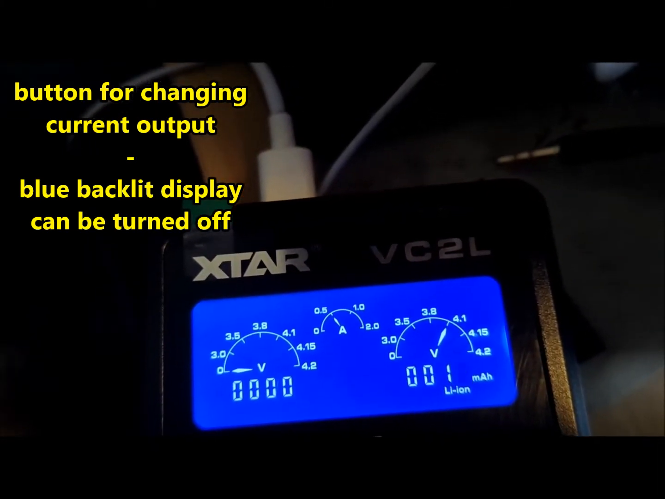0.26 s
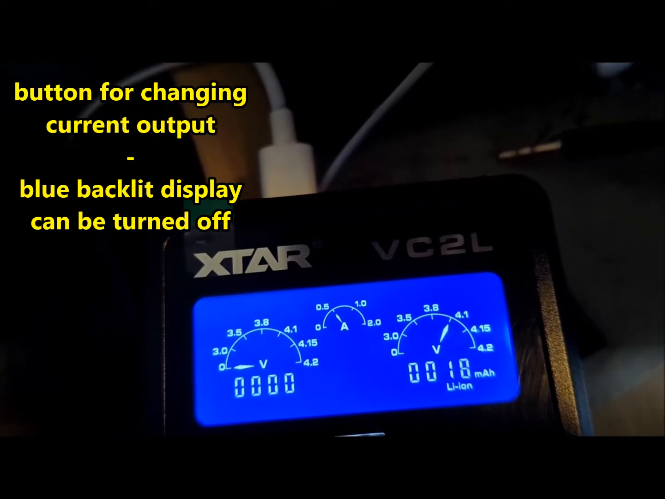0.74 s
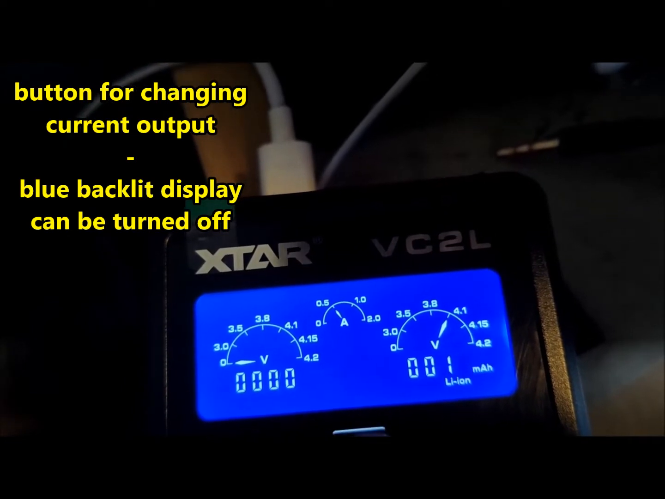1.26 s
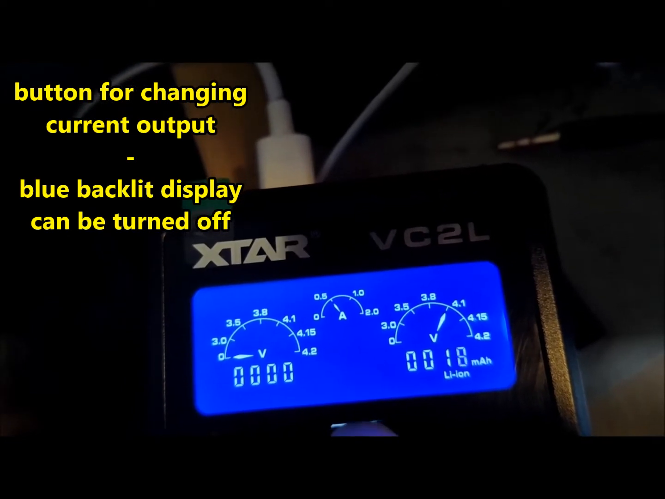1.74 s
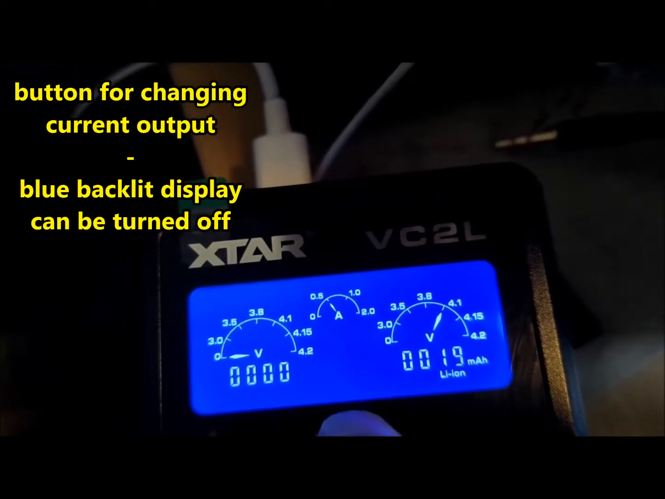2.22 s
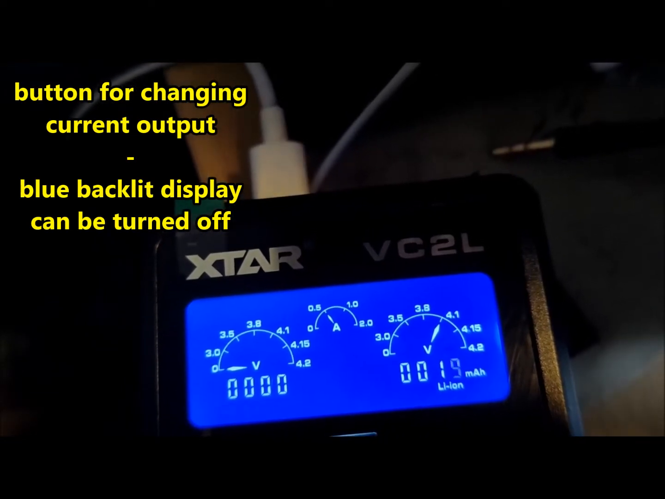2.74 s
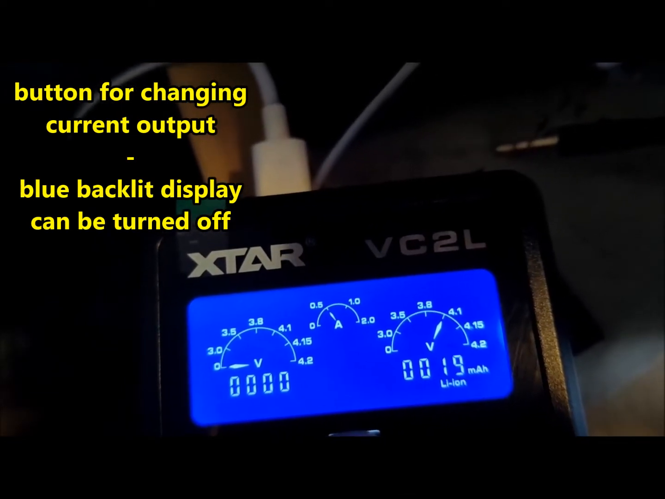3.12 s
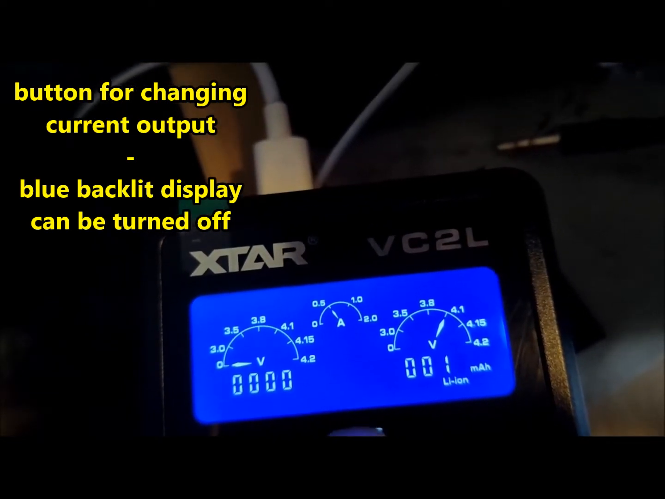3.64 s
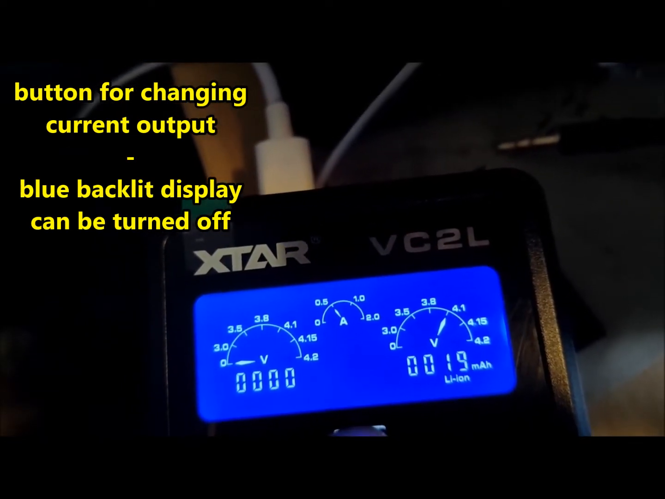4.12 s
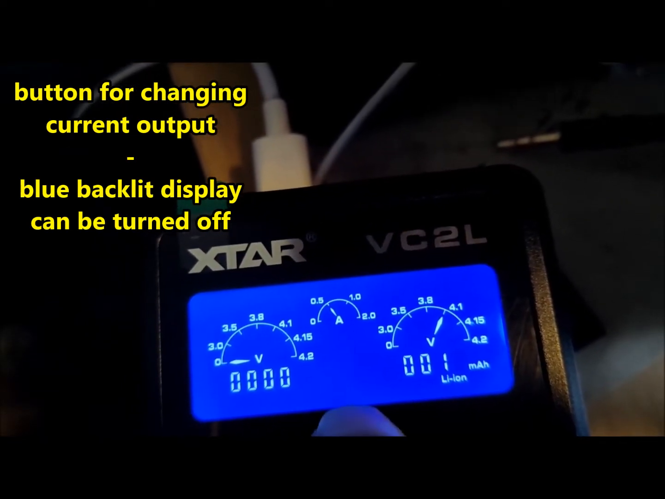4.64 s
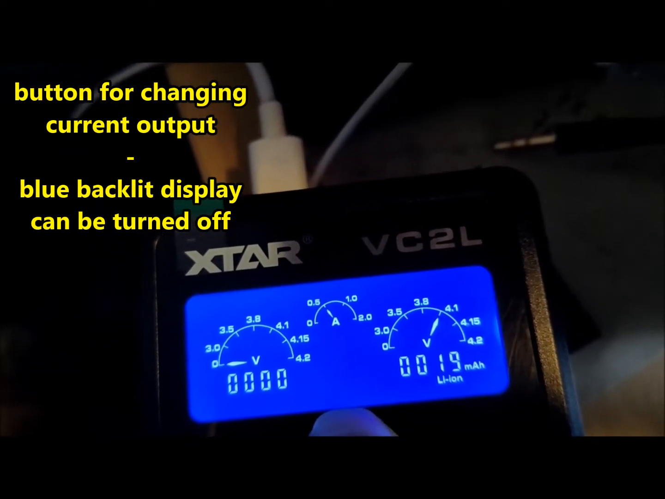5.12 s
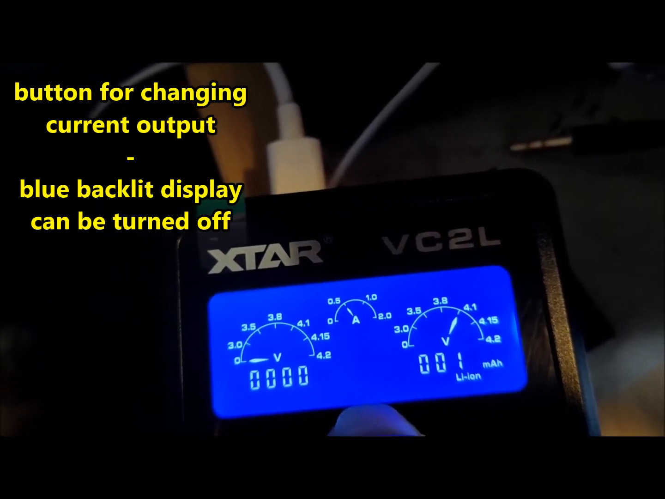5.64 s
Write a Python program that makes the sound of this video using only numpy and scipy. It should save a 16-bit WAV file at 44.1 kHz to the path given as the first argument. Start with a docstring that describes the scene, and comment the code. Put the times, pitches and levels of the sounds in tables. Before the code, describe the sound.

A finger works a small snappy push button on a plastic gadget, clicking down and springing back, with soft skin scuffs between.

```python
"""Small push button of a plastic battery charger, worked by a finger on a desk in a quiet room.
Each press and release snaps a metal dome; impulses ring modal resonators for dome, stem, cap, case and desk.
The loose cap also taps its seat. The finger rubs and nudges the case: stick-slip knocks and ticks,
rumble and rustle from shaped noise, one short judder from a wavering sine.
Room: discrete echoes and a banded noise tail. Underneath: faint mains hum (sines) and hiss (shaped noise)."""
import sys
import numpy as np
from scipy import signal
from scipy.fft import rfft, irfft
from scipy.io import wavfile

SR = 44100
rng = np.random.default_rng(int(sys.argv[2]) if len(sys.argv) > 2 else 0)


def waveform_to_disk(signal):
    """Save audio, clipped to [-1, 1], as 16-bit WAV at the path in sys.argv[1]."""
    frames = np.transpose(np.atleast_2d(signal))
    scaled = np.clip(frames, -1, 1) * 32767
    samples = np.round(scaled).astype(np.int16)
    wavfile.write(sys.argv[1], SR, samples)


N = 258896

# hum partials: f/Hz, mean level/dB rms
HUM_PARTIALS = [(119.5, -80), (238, -76.5), (360, -87)]
# hiss colour: f/Hz, relative density/dB
HISS_COLOUR = [(25, -19.5), (45, -10), (62, -13.5), (95, -14), (125, -6), (190, -12.5), (260, -8.5),
               (400, -6), (600, -12), (780, -16.5), (1150, -16), (2200, -22), (4600, -30.5), (6600, -20.5),
               (8200, -37), (11000, -70)]
HISS_RMS_DB = -74.5

# near echoes off the desk and things near by: delay/s, level/dB
ECHOES = [(.0016, -16.5), (.0035, -21.5), (.0047, -24.5), (.0097, -21), (0.0099, -26), (.042, -34)]
# diffuse tail colour: f/Hz, level/dB
TAIL_COLOUR = [(120, -7.5), (200, -4), (300, -14), (600, -9), (1100, -18), (1700, -24.5), (2500, -20.5),
               (3500, -24.5), (4500, -22), (6500, -15), (8000, -21)]
# diffuse tail decay: f/Hz, T60/s
TAIL_T60 = [(120, .2), (1000, 0.21), (4000, .19), (6500, 0.25), (8000, 0.2)]

# finger sliding on the case, before trim and flutter: t/s, rumble level/dB, rustle level/dB
RUB_LEVELS = [(0.0, -73, -77.5), (0.9, -72.5, -77.5), (1.45, -69.5, -77), (1.91, -70.5, -74.5),
              (2.48, -68, -71.5), (2.81, -66.5, -72), (3.32, -64.5, -68.5), (3.76, -69.5, -70.5),
              (4.51, -72.5, -71.5), (4.77, -77, -71.5), (5.56, -75, -73), (5.87, -79.5, -76.5)]
# rumble colour: f/Hz, relative density/dB
RUMBLE_COLOUR = [(15, -40), (25, -11), (96, -8), (125, 2), (151, -9.5), (177, -1.5), (199, -3),
                 (417, -13.5), (644, -6), (800, -24.5), (1040, -44.5), (1760, -120)]
# rustle colour: f/Hz, relative density/dB
RUSTLE_COLOUR = [(300, -22), (500, -8), (1150, 0.5), (2100, 0), (3000, -3.5), (4200, -14.5), (5200, -15),
                 (6400, -5.5), (7000, -10.5), (7800, -23), (8400, -48.5)]
# drags, each a run of slips: start/s, length/s, slip level before knock and tick gains/dB
DRAGS = [(2.025, .01, -57.5), (2.134, .01, -59.5), (2.276, .11, -58), (2.438, .08, -56.5),
         (2.649, .01, -55.5), (2.717, .01, -56), (3.028, .01, -56), (3.398, .035, -58), (3.549, .01, -58),
         (4.656, .035, -59.5), (5.059, .01, -56)]
SLIP_INTERVAL_S = .0238
# lesser random slips: rate at hardest rubbing, offset from the RUB_LEVELS rumble, random spread
STRAY_SLIPS_PER_S, STRAY_OFFSET_DB, STRAY_SPREAD_DB = 14, 4, 3.5
# slip resonances: f/Hz, width/Hz, level/dB
KNOCK_MODES = [(170.0, 153, 31.4), (269.4, 220, 23.4)]
TICK_MODES = [(600, 160, 7.5), (1780, 650, 5.3), (6400, 590, 5)]
JUDDER_HZ = 240   # mean
JUDDER_START_S, JUDDER_ATTACK_S, JUDDER_HOLD_S, JUDDER_RELEASE_S = 4.962, 0.017, .06, .02
JUDDER_DB, JUDDER_SAG_DB_PER_S = -54, 89   # sag runs from the start of the attack

# modes of the desk: f/Hz, width/Hz, level/dB
DESK_MODES = [(125, 21, 0), (180, 50, -6), (285.3, 55.3, 8), (334, 83, 4)]
# modes of the case: f/Hz, width/Hz, level/dB
CASE_MODES = [(530, 51, -16.5), (641, 46, -6), (789, 63, -1.5), (1095, 71, 0), (1370, 47, 3),
              (1641, 99, 11), (1920, 84, -7), (2095, 31, -7.5)]
# modes of the button cap: f/Hz, width/Hz, level/dB
CAP_MODES = [(2630, 200, -16.5), (2739, 150, 2), (2890, 210, -4), (3217, 130, 1.5)]
# modes of the button stem: f/Hz, width/Hz, level/dB
STEM_MODES = [(3450, 130, 9), (3640, 370, -1), (4300, 180, -4), (4930, 73, -12)]
# modes of the metal dome: f/Hz, width/Hz, level/dB
DOME_MODES = [(5700, 130, 2.8), (6000, 240, 15), (5970, 120, 16), (6510, 230, 27.56), (6920, 190, 23),
              (7300, 480, 13), (7700, 480, 11), (8100, 520, 2.2)]
# far sound, humps driven by case, cap, dome: gain/dB, f/Hz, width/Hz
FAR_HUMPS = [(5, 1400, 2000), (0, 3000, 1400), (24, 6750, 1700)]
# button goes down, dome buckles: t/s, force/dB, extra dome ping/dB
PRESSES = [(1.4608, -11.5, -19), (2.914, -2, -6), (4.119, -4, 5.5), (4.9168, -4.5, 5.5)]
# button springs back up: t/s, force/dB
RELEASES = [(0.001, -16.5), (0.2374, -3), (1.8014, -2.5), (3.1978, -2), (4.4176, 0.5), (5.2691, 1.24)]
# loose cap taps its seat: t/s, force/dB
TAPS = [(0.2527, -1.5), (0.2662, -10), (3.802, -5), (3.8141, -15)]
# share of a 0 dB press: desk/dB, case/dB, cap/dB, stem/dB, dome before ping/dB
PRESS_MIX = (-2, 0, 2.5, 12.5, -7.5)
# share of a 0 dB release: desk/dB, case/dB, cap/dB, stem/dB, dome/dB
RELEASE_MIX = (-0.2, -0.5, 2.5, -4, -25.5)
# share of a 0 dB tap: desk/dB, case/dB, cap/dB, stem/dB, dome/dB
TAP_MIX = (-16.5, -21, -17.5, -26, -35.5)
# harder is brighter, gain per dB of force: desk, case, cap, stem, dome (all dB/dB)
HARDNESS = (.5, 1.01, 1.4, 3.5, 1.27)

PASSBAND_EDGE_HZ = 7950


def from_db(db):
    """Decibels to gain."""
    return 10 ** (np.asarray(db) / 20)


def rms_one(x):
    """Scale to unit rms."""
    return x / np.sqrt(np.mean(x ** 2) + 1e-20)


def in_time(rows):
    """Interpolate each column of a time curve to every sample."""
    knots_s, *columns = np.transpose(rows)
    t = np.arange(N) / SR
    return [np.interp(t, knots_s, column) for column in columns]


def at_hz(points, hz):
    """Interpolate a spectrum on a log-frequency axis."""
    points_hz, values = np.array(points).T
    return np.interp(np.log(hz + 1), np.log(points_hz), values)


def noise(colour):
    """Steady Gaussian noise shaped in the spectrum, rms 1."""
    gain = from_db(at_hz(colour, np.fft.rfftfreq(N, 1 / SR)))
    return rms_one(irfft(rfft(rng.standard_normal(N)) * gain, N))


def drift(knots_per_s):
    """Slow random wander between Gaussian knots, rms 1."""
    position = np.arange(N) / SR * knots_per_s
    return rms_one(np.interp(position, np.arange(4096), rng.standard_normal(4096)))


def impulses(times_s, levels_db):
    """One impulse per blow."""
    out = np.zeros(N)
    index = np.round(np.asarray(times_s) * SR).astype(int)
    out[np.clip(index, 0, N - 1)] = from_db(levels_db)
    return out


def chatter(times_s, levels_db, share_db, t60_s):
    """A clean impulse per blow, then decaying noise as loose parts go on touching."""
    hits = impulses(times_s, levels_db)
    fall = from_db(-120 / (t60_s * SR))   # on power: 60 dB in t60_s
    power = signal.lfilter([1 - fall], [1, -fall], hits ** 2 + 1e-30)
    return hits + from_db(share_db) * np.sqrt(power) * rng.standard_normal(N)


def resonate(x, hz, width_hz):
    """Two-pole resonance, peak gain about 1."""
    r = np.exp(-np.pi * width_hz / SR)
    b = (1 - r * r) / 2
    a = [1, -2 * r * np.cos(2 * np.pi * hz / SR), r * r]
    return signal.lfilter([b, 0, -b], a, x + 1e-18)


def ring(x, modes):
    """Sum the modes of a part; neighbours have opposite sign."""
    out = np.zeros(N)
    for k, (hz, width_hz, db) in enumerate(modes):
        out += (-1) ** k * from_db(db) * resonate(x, hz, width_hz)
    return out


def background(waver_db=0.5):
    """Mains hum as sines of slowly wavering level, plus steady hiss."""
    t = np.arange(N) / SR
    hum = np.zeros(N)
    for hz, db in HUM_PARTIALS:
        level = from_db(db + waver_db * drift(6.7))
        hum += level * np.sqrt(2) * np.sin(2 * np.pi * (hz * t + rng.random()))
    return hum + from_db(HISS_RMS_DB) * noise(HISS_COLOUR)


def room(near, far, build_s=0.0048):
    """Close echoes of the near sound; diffuse tail of the far sound, decaying band by band."""
    t = np.arange(SR // 2) / SR
    edges_hz = np.geomspace(70, 11000, 13)
    tail = np.zeros(len(t))
    for low_hz, high_hz in zip(edges_hz, edges_hz[1:]):
        hz = np.sqrt(low_hz * high_hz)
        fade = from_db(-60 * t / at_hz(TAIL_T60, hz)) * (1 - np.exp(-t / build_s))
        band_pass = signal.butter(2, [low_hz, high_hz], "band", fs=SR, output="sos")
        band = signal.sosfilt(band_pass, rng.standard_normal(len(t)))
        tail += from_db(at_hz(TAIL_COLOUR, hz)) * band * fade / np.linalg.norm(fade)
    echoes = np.zeros(N)
    for delay_s, db in ECHOES:
        echoes += from_db(db) * np.pad(near, (round(delay_s * SR), 0))[:N]
    return near + echoes + signal.fftconvolve(far, tail)[:N]


def slips(rumble_db):
    """Skin slips, times and levels: evenly spaced in drags, stray ones denser with harder rubbing."""
    dragged = [(start_s + s, db) for start_s, length_s, db in DRAGS
               for s in np.arange(0, length_s, SLIP_INTERVAL_S)]
    stray_db = rumble_db + STRAY_OFFSET_DB + STRAY_SPREAD_DB * rng.uniform(-1.1, 1, N)
    per_s = STRAY_SLIPS_PER_S * from_db(rumble_db - rumble_db.max())
    stray = [(i / SR, stray_db[i]) for i in np.flatnonzero(rng.random(N) < per_s / SR)]
    return np.transpose(dragged + stray)


def judder(waver=0.019):
    """Short stick-slip judder: sine of wavering pitch with attack, sagging hold and release."""
    t = np.maximum(np.arange(N) / SR - JUDDER_START_S, 0)
    corners_s = np.cumsum([0, JUDDER_ATTACK_S, JUDDER_HOLD_S, JUDDER_RELEASE_S])
    level = np.interp(t, corners_s, [0, 1, 1, 0]) * from_db(JUDDER_DB - JUDDER_SAG_DB_PER_S * t)
    phase = 2 * np.pi * np.cumsum(JUDDER_HZ * (1 + waver * drift(60))) / SR
    return level * np.sqrt(2) * np.sin(phase)


def finger(knock_db=14, tick_db=12.0, rumble_trim_db=-3.0, boom_db=2, lumpy_db=3, grainy_db=1.76):
    """Skin sticks and slips on plastic: soft knocks, ticks, lumpy rumble, rustle, judder."""
    rumble_db, rustle_db = in_time(RUB_LEVELS)
    slip_s, slip_db = slips(rumble_db)
    knocks = ring(impulses(slip_s + .003, slip_db + knock_db), KNOCK_MODES)
    ticks = ring(chatter(slip_s, slip_db + tick_db, share_db=5.0, t60_s=0.069), TICK_MODES)
    flutter = drift(70)   # shared by rumble and rustle
    rumble = from_db(rumble_db + rumble_trim_db + lumpy_db * flutter) * noise(RUMBLE_COLOUR)
    boom = from_db(boom_db) * resonate(rumble + knocks, 176, 5.8)   # one low note of the desk
    rustle = from_db(rustle_db + grainy_db * flutter) * noise(RUSTLE_COLOUR)
    return knocks + ticks + rumble + boom + rustle + judder()


def blows():
    """Time of each button blow, then its level at desk, case, cap, stem and dome, brighter with force."""
    rows = []
    for table, mix in [(PRESSES, PRESS_MIX), (RELEASES, RELEASE_MIX), (TAPS, TAP_MIX)]:
        for time_s, force_db, *_ in table:
            rows.append([time_s, *(np.array(mix) + force_db * np.array(HARDNESS))])
    rows = np.array(rows)
    rows[:len(PRESSES), -1] += [ping_db for _, _, ping_db in PRESSES]
    return rows.T


def button(crack_db=-15, give_s=.0007, bounce_s=0.0017, bounce_db=-7):
    """Dome snaps and kicks stem, cap and case; the heavy desk answers last. Returns near, far."""
    s, desk_db, case_db, cap_db, stem_db, dome_db = blows()
    desk = ring(impulses(s + .002, desk_db), DESK_MODES)
    case = ring(chatter(s + give_s, case_db, share_db=-15, t60_s=.02), CASE_MODES)
    # loose cap lands twice
    bounce = chatter(s + bounce_s, cap_db + bounce_db, share_db=-3.5, t60_s=.015)
    cap = ring(impulses(s, cap_db) + bounce, CAP_MODES)
    stem = ring(chatter(s + give_s, stem_db, share_db=-12, t60_s=.02), STEM_MODES)
    snap = chatter(s, dome_db, share_db=-3.5, t60_s=.035)
    # dome modes all in step: sharp spike
    dome = sum(from_db(db) * resonate(snap, hz, width_hz) for hz, width_hz, db in DOME_MODES)
    # countless damped modes of the plastic merge into a dry crack
    crack = resonate(chatter(s + give_s, case_db + crack_db, share_db=9, t60_s=.04), 2000, 2100)
    # averaged over all directions, the modes blur into broad humps
    far = np.zeros(N)
    for part_db, (gain_db, hz, width_hz) in zip((case_db, cap_db, dome_db), FAR_HUMPS):
        hump = resonate(impulses(s, part_db + gain_db), hz, width_hz)
        far += resonate(hump, hz, width_hz)
    return desk + case + cap + stem + dome + crack, desk + far


def scene():
    """Button in the room; dry finger and background added."""
    near, far = button()
    return (room(near, far) + finger() + background())[None, :]


def record(dry):
    """Steep elliptic low-pass, then rounding to 16-bit steps."""
    low_pass = signal.ellip(9, .2, 42, PASSBAND_EDGE_HZ, fs=SR, output="sos")
    narrow = signal.sosfilt(low_pass, dry)
    return np.round(narrow * 2 ** 15) / 2 ** 15


dry = scene()
out = record(dry)
waveform_to_disk(out)
```